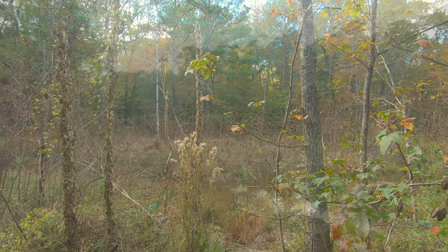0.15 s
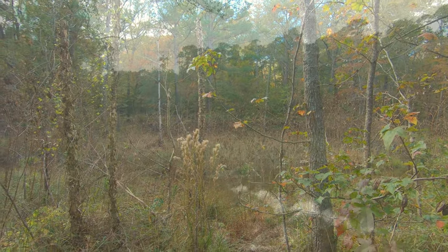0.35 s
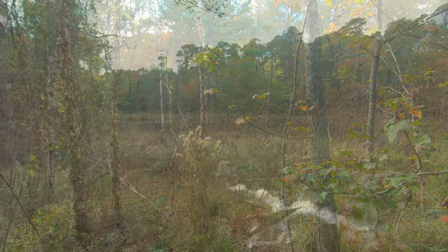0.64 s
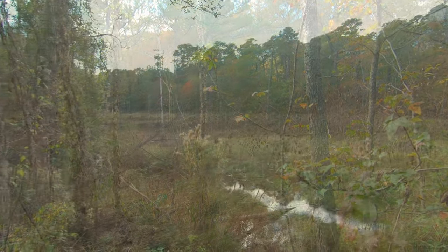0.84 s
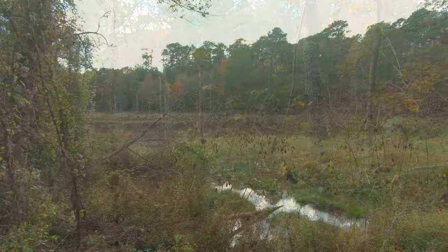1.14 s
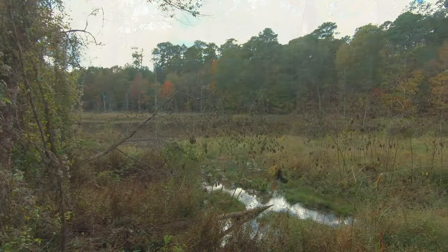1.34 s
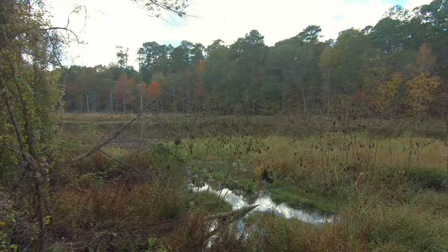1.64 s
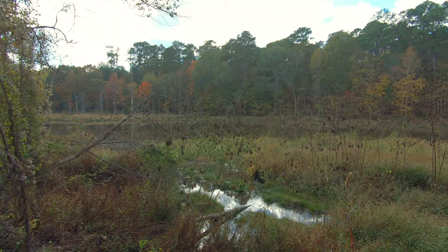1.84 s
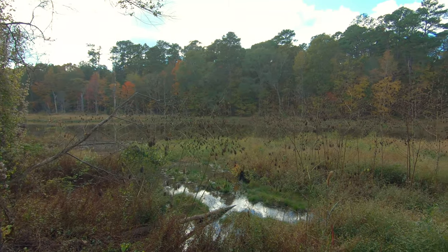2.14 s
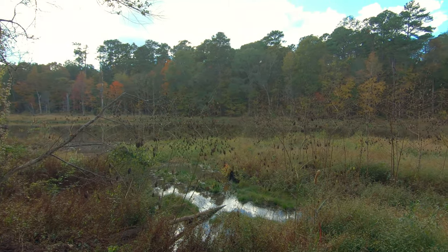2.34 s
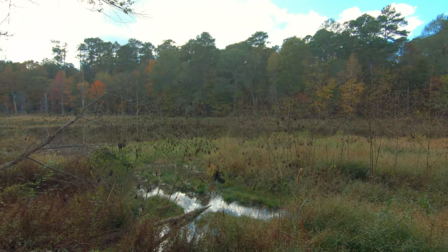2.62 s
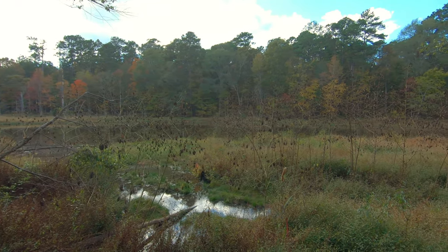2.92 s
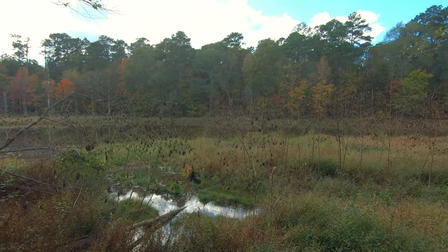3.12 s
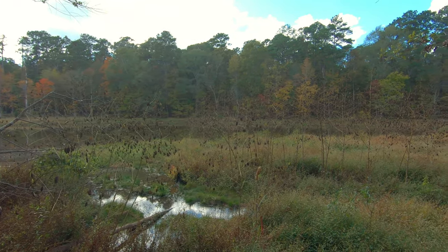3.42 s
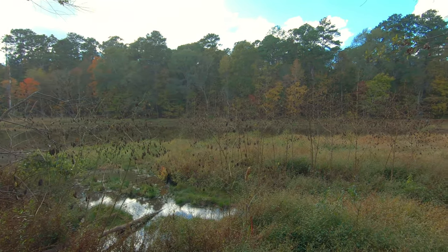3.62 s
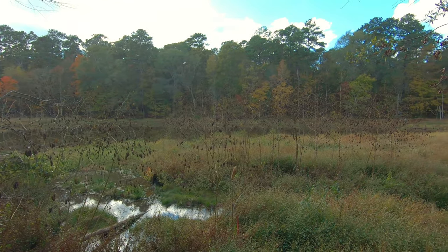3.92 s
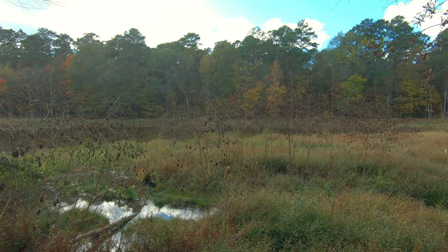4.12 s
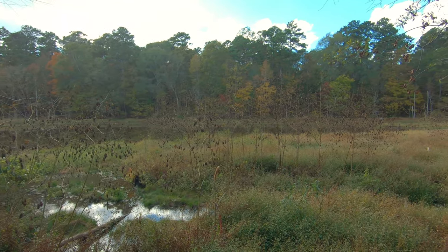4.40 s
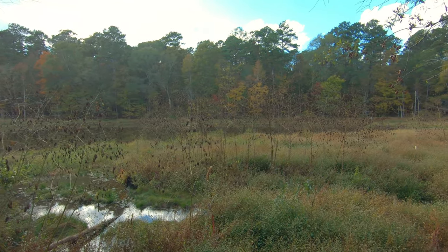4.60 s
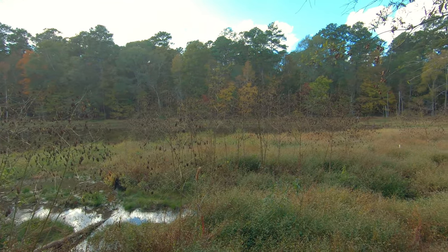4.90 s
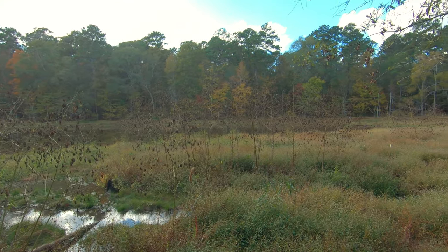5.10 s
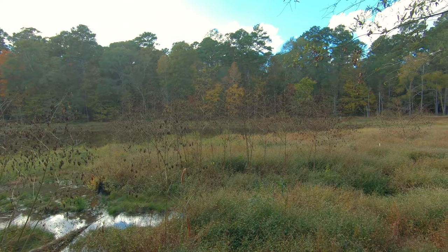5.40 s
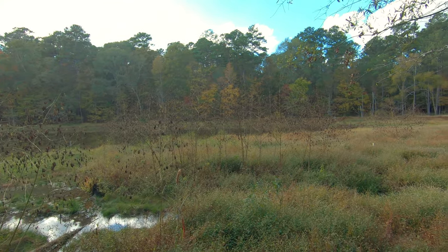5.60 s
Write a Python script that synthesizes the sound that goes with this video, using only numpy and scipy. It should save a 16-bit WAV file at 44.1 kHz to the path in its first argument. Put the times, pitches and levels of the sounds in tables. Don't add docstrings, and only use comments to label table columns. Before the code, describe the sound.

Close katydids buzz in rapid pulsing bursts over a high insect hiss in a marsh, with small distant birds, harsh wren scolds and low wind rumble.

```python
import sys
import numpy as np
from scipy import signal
from scipy.fft import rfft, irfft, next_fast_len
from scipy.io import wavfile
from scipy.ndimage import uniform_filter1d

SR = 44100
rng = np.random.default_rng(int(sys.argv[2]) if len(sys.argv) > 2 else 0)


def unload_audio(sound):
    columns = np.transpose(np.atleast_2d(sound))
    steps = np.round(np.clip(columns, -1, 1) * 32767)
    wavfile.write(sys.argv[1], SR, steps.astype(np.int16))


def voltage_ratio(level):
    return 10 ** (np.asarray(level, float) / 20)


N = 253575
T = np.arange(N) / SR

# frequency in Hz, level in dB per Hz.
AIR_SPECTRUM = [(30, -1.5), (55, -6), (130, -10), (220, -7), (500, -11), (1000, -14), (2000, -16),
                (4300, -18), (7000, -17), (9000, -13), (16000, -23.5)]
# frequency in Hz, level in dB per Hz.
WIND_SPECTRUM = [(.5, -8.5), (4, 1), (12, -4), (17.5, -8), (22, -33), (30, -44.5), (40, -39.5), (55, -57),
                 (90, -84)]
# time in seconds, level in dB.
GUST_LEVELS = [(0.0, -35), (0.05, -28), (0.26, -39.5), (0.34, -26), (1.6, -30), (1.63, -37), (2.34, -30.5),
               (2.45, -54.5), (2.63, -31), (3.15, -32), (3.3, -43), (3.38, -23.5), (3.6, -40.5),
               (3.7, -27.5), (4.0, -37), (4.21, -26), (5.32, -34), (5.75, -32)]
# time in seconds, level in dB, lower band relative to that in dB.
KATYDID_LEVELS = [(0.0, -68.5, -7), (0.24, -62, 0.5), (0.57, -55, -1.5), (0.83, -55, 0),
                  (0.99, -56.5, -0.5), (1.84, -59, -0.5), (2.74, -56, 1), (3.39, -56.5, -1),
                  (3.99, -59, -0.5), (4.39, -57.5, 2.5), (5.75, -55, 0)]
# frequency in Hz, level in dB per Hz.
FAR_WING = [(4120, -51.5), (7000, -17), (8160, -11), (10500, -9), (11400, -2), (11600, -4), (12300, 0),
            (13500, -2), (15100, -7), (15600, -21.5)]
# frequency in Hz, level in dB per Hz.
NEAR_WING_RING = [(6500, -32), (8000, -11), (10400, -8.5), (11300, -5), (12000, 1.5), (12450, -1.5),
                  (13000, 0), (13700, -2.5), (14300, -5.5), (15000, -14), (15700, -15)]
# frequency in Hz, share in dB.
LOWER_BAND = [(6000, -40), (7200, -2), (8000, -8), (10200, 4), (11500, -7.5), (13000, -47)]
# first stroke in seconds, length in seconds, strokes per
# second, share of the chorus from 0 to 1, wing shift in Hz.
NEAR_BUZZES = [
    (.1714, 1.0, 48.15, .82, 0),
    (1.5979, 1.4, 48.13, .55, 0),
    (3.0906, .52, 47.75, .55, 0),
    (3.7876, .9, 48.3, .36, 0),
    (5.1975, .7, 47.4, .68, 500),
]
# middle in seconds, level in dB.
WING_TICKS = [(.017, -60), (.085, -60.5), (1.825, -55), (1.889, -54.5), (1.955, -54.5), (2.02, -57),
              (2.085, -70), (2.145, -60), (2.21, -58), (3.789, -56), (3.855, -60), (3.92, -81),
              (3.985, -58), (4.7, -60), (4.77, -55), (4.84, -56), (4.915, -58)]
# middle in seconds, length in seconds, middle pitch in Hz, level in dB.
TRILL_PIPS = [(.003 + k / 57, .007, 5600, -75) for k in range(5)]
SLUR_NOTES = [(.113, .048, 2740, -75), (.238, .049, 2600, -74.5), (.37, .055, 2550, -78),
              (1.048, .042, 2580, -73), (1.18, .052, 2640, -76), (1.309, .041, 2440, -73.5),
              (1.434, .052, 2600, -74), (1.555, .062, 2700, -72.5), (1.717, .044, 2500, -74.5),
              (2.333, .042, 2740, -68.5), (2.42, .044, 2750, -71), (2.46, .082, 2810, -74),
              (2.56, .052, 2560, -71), (2.625, .038, 2420, -71.5), (2.717, .046, 2570, -72),
              (3.613, .04, 2770, -74), (3.94, .05, 2780, -71), (4.084, .067, 2540, -77),
              (4.239, .055, 2410, -73.5), (4.507, .042, 2540, -72.5), (4.673, .048, 2710, -72),
              (5.506, .062, 2650, -74)]
SEEP_NOTES = [
    (.141, .066, 6370, -74),
    (.385, .055, 6250, -77),
]
ANSWER_NOTES = [(.25, .026, 2690, -78), (.414, 0.02, 2700, -81), (.893, 0.043, 2770, -74),
                (2.197, .036, 2900, -70), (2.272, .02, 2740, -71), (3.788, .038, 2940, -72.5),
                (4.104, 0.028, 2800, -73), (4.369, .022, 2730, -79), (4.54, 0.033, 3000, -76),
                (4.864, .022, 2900, -70), (5.37, .04, 2850, -76), (5.553, .024, 2670, -84)]
ARCH_NOTES = [
    (1.542, .039, 3770, -73.5),
    (2.458, .055, 3850, -69.5),
    (3.517, 0.046, 3830, -68),
    (4.614, .04, 3670, -68.5),
    (4.705, .016, 3600, -70),
    (5.504, 0.047, 4000, -71),
]
HOOK_NOTES = [
    (2.024, .032, 5630, -68),
    (2.864, 0.03, 5550, -64),
    (3.15, .016, 5520, -67),
]
# knee in seconds, knee pitch in Hz, level in dB, strength of the upstroke from 0 to 1.
CHIP_CALLS = [(.472, 5520, -65, 0.9), (.533, 5630, -70, 0), (.773, 5700, -68, .1), (.886, 5600, -70, 0),
              (1.064, 5650, -72, 0), (1.477, 5400, -67, .95), (2.752, 5500, -69, .4), (3.198, 5020, -76, 0),
              (3.815, 5450, -75, 0), (3.866, 5500, -69.5, 0), (4.372, 5800, -72, 0)]
# seconds from the knee, Hz from the knee, level in dB.
CHIP_SHAPE = [
    (-.021, -1500, -7),
    (-.015, 499, 2),
    (0, 0, 1.5),
    (.006, -800, -4),
    (.013, -1900, -14),
]
# start in seconds, level
# in dB, pitch in # Hz, rise in seconds.
LOW_BUMPS = [
    (.79, -62, 133, 0.013),
    (0.868, -63.5, 110, 0.022),
    (1.34, -61.5, 93, 0.013),
    (1.488, -62.5, 93, 0.0087),
    (2.502, -46.5, 41, 0.03),
    (2.527, -47, 134, 0.01),
    (3.031, -55.5, 107, 0.0046),
    (4.68, -65, 133, 0.027),
    (4.969, -72, 57, 0.0076),
    (5.705, -30, 6.5, 0.044),
]
# frequency in Hz, level in dB per Hz.
RUB_SPECTRUM = [(45, -54), (70, -0.5), (105, -0.5), (140, -8.5), (200, -12.5), (400, -45.5)]
# start in seconds, level in dB.
TWIG_SNAPS = [
    (5.292, -36.5),
]
# peak in seconds, lead-in in seconds, throat pitch in Hz, peak level in dB.
NEAR_SCOLDS = [(1.612, 0.022, 6420, -63.5), (1.686, 0.042, 6380, -61.5), (1.765, 0.054, 6440, -61),
               (1.88, 0.08, 6200, -61.5), (1.975, 0.054, 6230, -61), (2.09, .06, 6240, -60),
               (2.168, 0.055, 6460, -61), (2.21, 0.025, 6200, -62.5), (2.35, 0.035, 7170, -61.5),
               (5.088, 0.031, 6400, -53.5), (5.153, 0.039, 6150, -53.5), (5.222, 0.031, 6420, -53),
               (5.297, .04, 6380, -53), (5.376, 0.039, 6340, -52.5), (5.475, 0.047, 6350, -52),
               (5.552, 0.037, 6510, -52.5), (5.607, 0.011, 6420, -57), (5.655, 0.033, 6410, -52.5),
               (5.742, 0.046, 6300, -52.5)]
DISTANT_SCOLDS = [(1.895, 0.039, 5380, -63.5), (1.99, 0.027, 5450, -62.5), (2.1, 0.043, 5520, -64),
                  (2.2, 0.024, 5440, -61.5), (2.32, 0.026, 5190, -62), (2.428, 0.025, 5320, -62),
                  (4.51, 0.036, 5230, -66), (4.603, 0.027, 5230, -65.5), (4.705, .03, 5300, -66),
                  (4.79, 0.034, 5230, -66), (4.895, 0.027, 5220, -63), (5.0, 0.03, 5210, -64)]
# factor on the throat pitch, level in dB per Hz.
NEAR_THROAT = [(.25, -31), (.36, -21.5), (.58, -21.5), (.65, -18), (.76, -11), (.88, -8.5), (.96, -3),
               (1.0, -1.5), (1.05, -3), (1.18, -6.5), (1.24, -14), (1.6, -44)]
DISTANT_THROAT = [(.4, -26), (.6, -13), (.76, -22), (.85, -15), (.95, -5.5), (1.02, -2.5), (1.25, -13.5),
                  (1.45, -25), (1.8, -57)]


def evened(x):
    return x / np.sqrt(np.mean(x ** 2) + 1e-20)


def curve(rows):
    s, *columns = np.transpose(rows)
    return [np.interp(T, s, c) for c in columns]


def colour(x, points):
    f, db = np.transpose(points)
    size = next_fast_len(len(x))
    hz = np.fft.rfftfreq(size, 1 / SR)
    gain = voltage_ratio(np.interp(np.log(hz + 1), np.log(f + 1), db))
    return irfft(rfft(x, size) * gain, size)[:len(x)]


def drift(hz):
    lowpass = signal.butter(2, hz, fs=SR, output="sos")
    return evened(signal.sosfilt(lowpass, rng.standard_normal(N)))


def smoothed_twice(x, size):
    return uniform_filter1d(uniform_filter1d(x, size=size), size=size)


def add(mix, s, sound):
    part = mix[max(round(s * SR), 0):][:len(sound)]
    part += sound[:len(part)]


def air():
    level_db, start_db, rise_s, growth_db_per_s = -66.5, -1.5, 0.76, 0.1135
    hiss = evened(colour(rng.standard_normal(N), AIR_SPECTRUM))
    opening_db = start_db * np.maximum(1 - T / rise_s, 0)
    return voltage_ratio(level_db + opening_db + growth_db_per_s * T + 0.19 * drift(hz=14)) * hiss


def wind():
    onset_s = 0.029
    push = colour(rng.standard_normal(N), WIND_SPECTRUM)
    power = smoothed_twice(push ** 2, SR // 6)
    gusts = smoothed_twice(voltage_ratio(curve(GUST_LEVELS)[0]), SR // 14)
    onset = np.sin(np.pi / 2 * np.minimum(T / onset_s, 1)) ** 2
    return gusts * onset * push / np.sqrt(power)


def teeth(per_s, spread_db):
    struck = rng.random(N) < per_s / SR
    return struck * voltage_ratio(spread_db * rng.standard_normal(N)) * rng.choice([-1, 1], N)


def buzzes():
    swell_s = 0.075
    turns, own, shift = np.zeros((3, N))
    for start, length, per_s, share, hz in NEAR_BUZZES:
        begun = T > start - swell_s / 2
        turns = np.where(begun, per_s * (T - start), turns)
        shift = np.where(begun, hz, shift)
        to_edge = np.minimum(T - start, start + length - T)
        own += share * np.clip(to_edge / swell_s + .5, 0, 1)
    return turns, own, shift


def wing_ticks():
    burst, strokes = signal.windows.tukey(round(0.02 * SR), .45), np.zeros(N)
    for s, db in WING_TICKS:
        add(strokes, s - len(burst) / SR / 2, voltage_ratio(db) * burst)
    return strokes * evened(colour(teeth(per_s=17000, spread_db=5.5), FAR_WING))


def katydids():
    turns, own, shift = buzzes()
    level_db, lower_db = curve(KATYDID_LEVELS)
    place = turns % 1
    swell = np.clip((place - .35) / 0.41, 0, 1) * (place < .97)
    stroke = evened(uniform_filter1d(swell, size=90))
    near = evened(colour(stroke * teeth(per_s=10000, spread_db=2.5), NEAR_WING_RING))
    analytic = signal.hilbert(near, next_fast_len(N))[:N]
    near = (analytic * np.exp(2j * np.pi * shift * T)).real
    far = evened(colour(voltage_ratio(1.07 * drift(hz=25.7)) * rng.standard_normal(N), FAR_WING))
    own = np.clip(0.76 * own, 0, .9)
    wings = np.sqrt(own) * near + np.sqrt(1 - own) * far
    lower = (voltage_ratio(lower_db) - 1) * colour(wings, LOWER_BAND)
    return voltage_ratio(level_db) * (wings + lower) + wing_ticks()


def cricket():
    level_db, fade_db_per_s = -76.5, 1
    turns = np.cumsum(26 * (1 + 0.032 * drift(hz=1.1))) / SR
    pulses = 0.41 + np.clip(np.sin(2 * np.pi * turns) + 0.17, 0, 1)
    tone = np.sin(2 * np.pi * np.cumsum(8115 + 110 * drift(hz=60)) / SR)
    return voltage_ratio(level_db - fade_db_per_s * T + 2.7 * drift(hz=9.5)) * evened(pulses * tone)


def whistles(notes, into, away):
    out = np.zeros(N)
    arched = into > 0 > away
    bend = 1.6 if arched else 1
    for s, length, middle, db in notes:
        u = np.linspace(-1, 1, round(length * SR))
        hz = middle + np.where(u < 0, -into, away) * length / 2 * abs(u) ** bend
        turns = np.cumsum(hz) / SR
        note = np.sin(2 * np.pi * turns)
        if arched and middle < 4500:
            note += .75 * np.hanning(len(u)) * np.sin(2 * np.pi * 1.068 * turns)
        add(out, s - length / 2, voltage_ratio(db + 2.1) * np.hanning(len(u)) ** 0.46 * note)
    return out


def chips():
    out = np.zeros(N)
    at, step, shape_db = np.transpose(CHIP_SHAPE)
    t = np.arange(at[0], at[-1], 1 / SR)
    for s, hz, db, up in CHIP_CALLS:
        pitch = uniform_filter1d(hz + np.interp(t, at, step), size=100)
        upstroke = np.interp(t, at[:3], [up, (1 + up) / 2, 1])
        size = voltage_ratio(db + np.interp(t, at, shape_db)) * upstroke
        tone = np.sin(2 * np.pi * np.cumsum(pitch) / SR)
        add(out, s + at[0], signal.windows.tukey(len(t), .15) * size * tone)
    return out


def birds():
    notes = whistles(TRILL_PIPS, into=-20000, away=-40000)
    notes += whistles(SLUR_NOTES, into=-38000, away=-25000)
    notes += whistles(SEEP_NOTES, into=7000, away=10000)
    notes += whistles(ANSWER_NOTES, into=-30000, away=-24000)
    notes += whistles(ARCH_NOTES, into=34900, away=-32000)
    notes += whistles(HOOK_NOTES, into=46000, away=-90000)
    return (notes + chips()) * voltage_ratio(1.5 * drift(hz=250))


def trees(x, t60=0.33):
    t = np.arange(SR // 2) / SR
    trunks = (rng.random(len(t)) < 1500 / SR) * rng.choice([-1, 1], len(t))
    tail = trunks * voltage_ratio(-60 * t / t60) * (t > .008)
    return signal.oaconvolve(x, tail / np.linalg.norm(tail))[:N]


def knocks():
    out, t = np.zeros(N), np.arange(6000) / SR
    for s, db, hz, rise in LOW_BUMPS:
        shape = (t / rise) ** 2 * np.exp(2 - 2 * t / rise)
        add(out, s, voltage_ratio(db) * np.sin(2 * np.pi * hz * t) * shape)
    t = t[:200]
    for s, db in TWIG_SNAPS:
        crack = np.sin(2 * np.pi * 9200 * t) + 0.16 * np.sin(2 * np.pi * 1400 * t)
        add(out, s, voltage_ratio(db - 60 * t / 0.0033) * crack)
    rub = evened(colour(rng.standard_normal(N), RUB_SPECTRUM))
    return out + voltage_ratio(-78.5 + 4.2 * drift(hz=6.2)) * rub


def scolds(notes, throat, lead_db, breathy):
    out = np.zeros(N)
    for s, lead, hz, db in notes:
        t = np.arange(-lead - .01, .04, 1 / SR)
        shake, breath, size = rng.standard_normal((3, SR // 5))
        rate = hz / 6 * (1 + .5 * uniform_filter1d(shake, size=40))
        turns = np.cumsum(rate) / SR
        pulses = np.diff(np.floor(turns), prepend=0) * voltage_ratio(3.5 * size)
        drive = evened(pulses) + breathy * breath
        rasp = evened(colour(drive, [(hz * k, d) for k, d in throat]))[:len(t)]
        shape_db = np.interp(t, [-lead - .01, -lead, -.014, -.003, .007, .016, .04],
                             [-30, lead_db, lead_db + 2.0, 0, -1.5, -12, -30])
        add(out, s + t[0], voltage_ratio(db + shape_db) * rasp)
    return out


def scene():
    notes = birds()
    wrens = scolds(NEAR_SCOLDS, NEAR_THROAT, lead_db=-7.5, breathy=1.7)
    wrens += scolds(DISTANT_SCOLDS, DISTANT_THROAT, lead_db=-6.5, breathy=1.3)
    echoes = trees(voltage_ratio(-10) * wrens + voltage_ratio(-8.0) * notes)
    mix = air() + wind() + katydids() + cricket() + notes + knocks() + wrens + echoes
    return mix[None]


def roll_off(x):
    return signal.sosfilt(signal.butter(12, 15760, fs=SR, output="sos"), x)


def record(dry):
    return roll_off(dry)


dry = scene()
out = record(dry)
unload_audio(out)
```